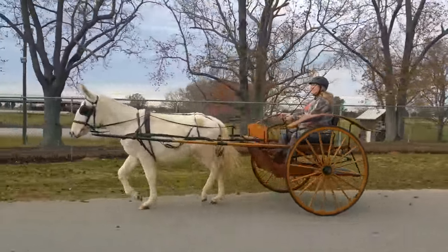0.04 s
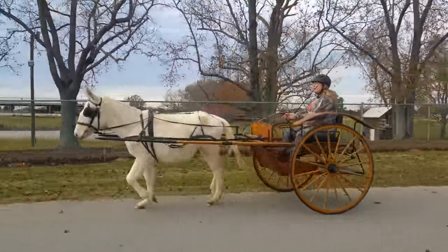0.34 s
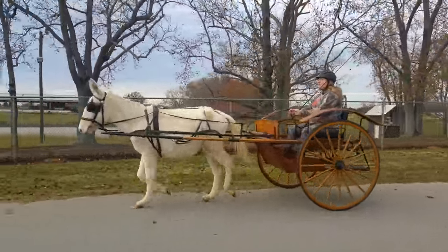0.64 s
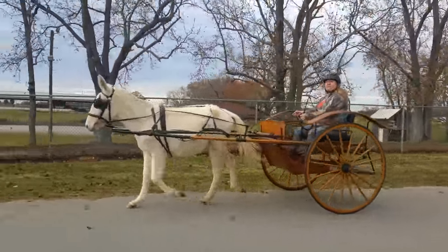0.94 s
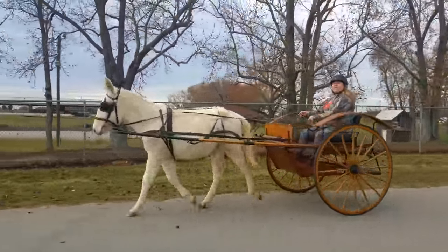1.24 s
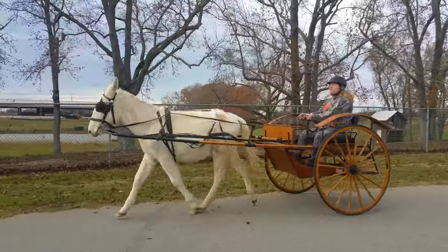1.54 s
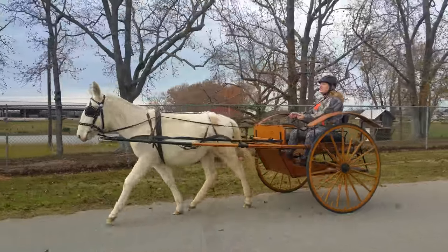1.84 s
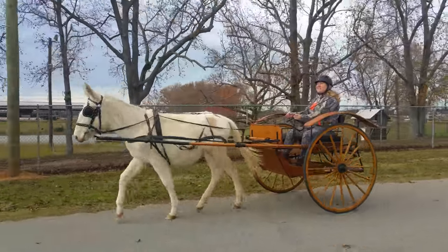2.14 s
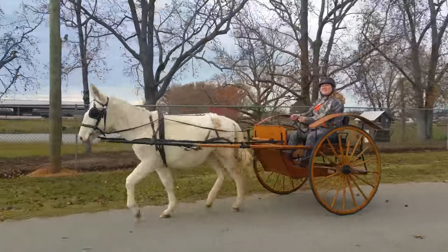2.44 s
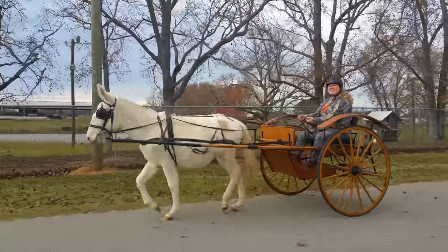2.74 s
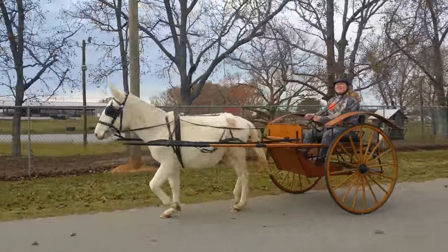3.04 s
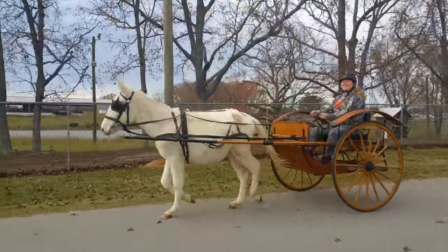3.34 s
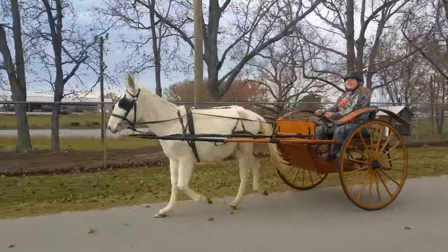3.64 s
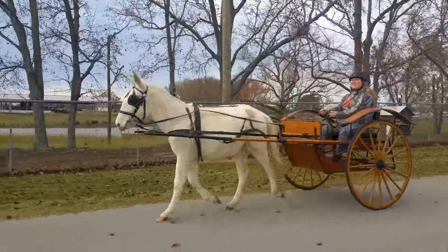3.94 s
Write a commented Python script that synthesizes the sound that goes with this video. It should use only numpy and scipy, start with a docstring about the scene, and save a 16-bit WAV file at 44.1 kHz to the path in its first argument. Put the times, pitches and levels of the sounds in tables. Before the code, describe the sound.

Gritty, slightly hollow hoof clops keep a walking pace on an outdoor road, mixed with bright little rattles from a cart and harness. Dull gusts buffet the accompanying microphone at first, ease off, then return.

```python
"""A mule clops and scuffs along a paved country lane, drawing a light two-wheeled cart.
Each hoof gives a gritty clap and a hollow ring; harness and cart rattle brightly and squeak once,
and grit snaps under shoe and wheel, over a faint outdoor wash. The microphone travels alongside,
and gusts buffet its two ports separately, in short dull thumps and flutters."""
import sys
import numpy as np
from scipy import signal
from scipy.fft import rfft, irfft
from scipy.io import wavfile
from scipy.ndimage import uniform_filter1d

SR = 44100
rng = np.random.default_rng(int(sys.argv[2]) if len(sys.argv) > 2 else 0)


def put_to_file(sound):
    """Save the sound as 16-bit audio at rate SR, in the file named by the first command-line argument."""
    columns = np.atleast_2d(sound).T  # one column per channel
    safe = np.clip(columns, -1, 1)
    whole_steps = np.round(safe * 32767)
    wavfile.write(sys.argv[1], SR, whole_steps.astype(np.int16))


N = 176400
TIME = np.arange(N) / SR

# two noise registers, bright clatter and airy sizzle: (frequency [Hz], level [dB])
CLATTER_EQ = [(1000, -14), (2500, 5.5), (4000, 5.5), (6000, 2), (7500, -7), (10000, -14)]
SIZZLE_EQ = [(4000, -21), (7500, -5), (9500, 2), (12300, 4), (16000, 1)]


def from_db(db):
    """Decibels to gain."""
    return 10 ** (np.asarray(db) / 20)


def rms_one(x):
    """Scale to an rms of 1."""
    return x / np.sqrt(np.mean(x ** 2) + 1e-20)


def at_hz(curve, hz):
    """Read a curve on a log-frequency axis."""
    points_hz, values = np.array(curve).T
    return np.interp(np.log(np.maximum(hz, 1)), np.log(points_hz), values)


def drift(rate_hz):
    """Smooth random modulation; rms 1."""
    pole = np.exp(-2 * np.pi * rate_hz / SR)
    return rms_one(signal.lfilter([1], [1, -2 * pole, pole * pole], rng.standard_normal(N + SR)))[SR:]


def oscillator(hz):
    """A sine that follows a moving frequency; rms 1."""
    return np.sqrt(2) * np.sin(2 * np.pi * np.cumsum(hz) / SR)


def stereo_noise(eq):
    """Coloured noise at both ports, narrow in the bass and wide in the treble; rms 1."""
    # how alike the two ports hear the scene: (frequency [Hz], correlation)
    likeness = [(100, 1), (700, 0.52), (2500, 0.12), (6000, 0.017), (15000, 0.05)]
    # the microphone's lean to one side: (frequency [Hz], left minus right [dB])
    lean = [(200, -4), (1000, 4.5), (2500, -5.5), (5000, -5), (9500, 2)]
    hz = np.arange(N // 2 + 1) * SR / N
    mid, side = rfft(rng.standard_normal((2, N)))
    alike = at_hz(likeness, hz)
    spectrum = np.sqrt(1 + alike) * mid + np.sqrt(1 - alike) * side * [[1], [-1]]
    pan = from_db(at_hz(lean, hz) * [[.5], [-.5]])
    return rms_one(irfft(spectrum * from_db(at_hz(eq, hz)) * pan, N))


def bursts(events, attack_s, release_s, tail_db=None, tail_s=None, swell_db=0):
    """Envelope of (start [s], length [s], level [dB]) events: attack, hold or swell, release, tail."""
    power = np.zeros(N)
    for start, length, db in events:
        span = slice(max(int(start * SR), 0), max(int((start + length + .5) * SR), 0))
        age = np.maximum(TIME[span] - start, 0)
        after = np.maximum(age - length, 0)
        decay = np.exp(-2 * after / release_s)
        if tail_s:
            decay += from_db(tail_db) ** 2 * np.exp(-2 * after / tail_s)
        arch = np.sin(np.pi * np.minimum(age / length, 1)) - 2 / np.pi
        power[span] += (from_db(db + swell_db * arch) * np.minimum(age / attack_s, 1)) ** 2 * decay
    return np.sqrt(power)


def outdoors():
    """The bed: distant traffic and trees, and a faint, steady high hiss of the microphone."""
    # outdoor wash: (frequency [Hz], level [dB])
    wash_eq = [(25, -1.5), (70, 7), (200, -6.5), (500, -9), (1000, -14), (1500, -21.5), (3000, -20.5),
               (5500, -23), (7500, -38.5), (16000, -42)]
    wash = from_db(-43 + 1.53 * drift(10)) * stereo_noise(wash_eq)
    mic_hiss = from_db(-70.5) * stereo_noise(SIZZLE_EQ)
    return wash + mic_hiss


def turbulence(gusts, eq):
    """Wind noise at one port: it flutters within each gust and brightens as it grows stronger."""
    reference_db, pivot_hz, brightening = -17, 228, 0.47
    flutter = from_db(3.5 * drift(70.5))
    flutter /= np.sqrt(uniform_filter1d(flutter ** 2, size=SR // 36))
    breeze = from_db(-64 + 13.5 * drift(13.5))  # light air between the gusts
    strength = np.hypot(bursts(gusts, attack_s=0.00075, release_s=0.012) * flutter, breeze)
    tilt_db_per_octave = brightening * (20 * np.log10(strength) - reference_db)
    edges_hz = 18 * 2 ** np.arange(0, 9.6, .5)
    white = rng.standard_normal((2, N))  # neighbouring bands get unrelated noise
    steady, tilted = 0, 0
    for k, (low, high) in enumerate(zip(edges_hz, edges_hz[1:])):
        hz = np.sqrt(low * high)
        bandpass = signal.butter(3, [low, high], "band", fs=SR, output="sos")
        band = from_db(at_hz(eq, hz)) * signal.sosfilt(bandpass, white[k % 2])
        steady += band
        tilted += band * from_db(tilt_db_per_octave * np.clip(np.log2(hz / pivot_hz), -1, 2.5))
    return strength * tilted / np.sqrt(uniform_filter1d(steady ** 2, size=700) + 1e-12)


def thumps(eddies):
    """An eddy pushes on the port and shakes the pressure through a few large, uneven swings."""
    swing_db, push_db, wander_octaves = -1, -7, 0.6
    wander = 2 ** (wander_octaves * np.clip(drift(259.3), -2, 1))
    pressure = 0
    for start, length, db, hz in eddies:
        envelope = bursts([(start, length, db)], attack_s=0.0012, release_s=0.0036)
        pressure += envelope * (from_db(swing_db) * oscillator(hz * wander) + from_db(push_db))
    return signal.sosfilt(signal.butter(2, 60, "high", fs=SR, output="sos"), pressure)


def wind():
    """Each port takes its own gusts; single eddies add a thump and a puff of noise on the left."""
    # gusts hitting each port: (start [s], length [s], level [dB])
    gusts_left = [(0.023, 0.016, -18), (0.238, 0.026, -20), (0.267, 0.036, -17), (0.37, 0.0055, -14),
                  (0.408, 0.027, -12), (0.454, 0.016, -13.5), (0.483, 0.0091, -12), (0.512, 0.058, -16),
                  (0.942, 0.027, -32.5), (1.803, 0.012, -20.5), (1.99, 0.045, -29.5),
                  (2.153, 0.0075, -22.5), (2.707, 0.018, -29), (2.789, 0.084, -20.5), (2.801, 0.037, -8.5),
                  (2.913, 0.012, -11.5), (2.976, 0.0088, -21.5), (3.045, 0.062, -19.5),
                  (3.105, 0.0083, -13), (3.271, 0.0027, -15.5), (3.323, 0.0043, -15), (3.336, 0.007, -15),
                  (3.484, 0.0052, -16), (3.556, 0.0062, -22), (3.92, 0.068, -18.5), (3.935, 0.0087, -10)]
    gusts_right = [(0.02, 0.038, -23.5), (0.06, 0.035, -21.5), (0.096, 0.0059, -13.5),
                   (0.123, 0.037, -17.5), (0.3, 0.035, -22), (0.343, 0.0033, -14), (0.41, 0.039, -21.5),
                   (0.447, 0.02, -16.5), (0.65, 0.025, -26.5), (0.905, 0.05, -28.5), (1.02, 0.094, -28.5),
                   (1.404, 0.0015, -21.5), (1.73, 0.036, -22), (1.838, 0.059, -21.5), (2.016, 0.068, -28),
                   (2.195, 0.025, -21.5), (2.375, 0.017, -26.5), (2.728, 0.089, -26), (2.74, 0.0088, -16),
                   (2.826, 0.121, -17), (2.831, 0.023, -12.5), (2.968, 0.057, -22.5), (3.085, 0.09, -24),
                   (3.372, 0.0046, -14.5), (3.392, 0.062, -22), (3.51, 0.1, -28), (3.599, 0.013, -16.5),
                   (3.666, 0.025, -17), (3.745, 0.086, -29.5), (3.815, 0.013, -24.5),
                   (3.964, 0.0027, -12.5), (3.982, 0.03, -19)]
    # tone of the wind at each port before the tilt: (frequency [Hz], level [dB])
    eq_left = [(22, -4), (45, -4.5), (80, 2.5), (150, 2), (400, -6), (750, -14.5), (1300, -32), (2200, -61),
               (5000, -100), (12000, -92)]
    eq_right = [(22, -35), (45, -29), (80, -7), (150, -2.5), (400, 1), (750, -4.5), (1300, -24),
                (2200, -34), (5000, -61), (12000, -89)]
    # eddies: (start [s], length [s], relative level [dB], centre pitch [Hz])
    eddies = [(0.184, 0.0031, -11, 360), (.358, 0.0065, -5.5, 283), (0.489, 0.0035, -7, 600),
              (0.549, 0.0052, -15, 280), (1.207, 0.011, -11, 290), (1.343, 0.0042, -10, 390),
              (2.152, 0.019, -16.5, 208), (3.545, 0.0021, -5, 379.6), (3.624, 0.0079, -7, 532),
              (3.903, 0.0025, -9, 189.8)]
    puffs = [(start, length, db - 2.5) for start, length, db, _ in eddies]
    left = turbulence(list(gusts_left) + puffs, eq_left) + thumps(eddies)
    return np.array([left, turbulence(gusts_right, eq_right)])


def squeak():
    """One faint, thin squeak that wavers as it glides down."""
    # the glide: (start [s], length [s], first pitch [Hz], last pitch [Hz], level [dB])
    glide = [(3.424, 0.04, 5050, 4800, -49.5)]
    start, length, first_hz, last_hz, db = glide[0]
    waver = 1 + 0.0231 * drift(246)
    pitch = waver * np.interp(TIME, [start, start + length], [first_hz, last_hz])
    return bursts([(start, length, db)], attack_s=0.0062, release_s=0.0062) * oscillator(pitch)


def grit_snaps():
    """Grains of grit crack under shoe and wheel, each a sharp, bright tick."""
    # cracking grains: (time [s], relative level [dB])
    snaps = [(0.386, -47), (1.3, -43.5), (1.432, -49), (2.191, -37.5), (2.592, -48.5), (2.843, -34),
             (3.052, -42.5)]
    crack_s = 0.00024
    envelope = bursts([(start, crack_s, db) for start, db in snaps], crack_s, release_s=0.004)
    return envelope * (stereo_noise(SIZZLE_EQ) + from_db(4.5) * stereo_noise(CLATTER_EQ))


def rattles():
    """Harness, cart and shoes rattle and scuff; clatter and sizzle each crackle with their own grain."""
    # rattles and scuffs: (start [s], length [s], relative level [dB], clatter send [dB])
    shakes = [(0.001, 0.013, -45, -4.5), (0.418, 0.03, -61, 20.5), (0.433, 0.038, -46, 10),
              (0.482, 0.0041, -60, 20), (0.633, 0.037, -65.5, 11.5), (0.683, 0.036, -55, -3),
              (1.058, 0.08, -56.5, 6), (1.179, 0.023, -48, 9.5), (1.368, 0.03, -56.5, 8.5),
              (1.434, 0.042, -56, 6), (1.594, 0.055, -45.5, 0), (1.702, 0.043, -59, 6.5),
              (2.023, 0.049, -57, 5), (2.386, 0.012, -58, 9.5), (2.711, 0.02, -52.5, 5.5),
              (3.12, 0.001, -52.5, 19), (3.381, 0.03, -56.5, 7.5), (3.423, 0.06, -59.5, 9),
              (3.715, 0.017, -57.5, 5.5)]
    sizzle_db, clatter_db, grain_db = -2.5, 1.5, 4
    shape = dict(attack_s=0.00081, release_s=0.0036, tail_db=-6, tail_s=0.029, swell_db=7.5)
    sizzles = [(start, length, db + sizzle_db) for start, length, db, _ in shakes]
    clatters = [(start, length, db + send + clatter_db) for start, length, db, send in shakes]
    sizzle = bursts(sizzles, **shape) * stereo_noise(SIZZLE_EQ)
    clatter = bursts(clatters, **shape) * stereo_noise(CLATTER_EQ)
    return sum(layer * rms_one(from_db(grain_db * drift(460))) for layer in (sizzle, clatter))


def road_ticks():
    """Random small knocks of grit under the wheels, as events for bursts()."""
    ticks_per_s, length_s = 22, 0.002
    gap_draws, level_draws = rng.random((400, 2)).T
    starts = np.cumsum(-np.log(gap_draws)) / ticks_per_s
    levels = -39.5 - 2 * level_draws
    return [(start, length_s, db) for start, db in zip(starts, levels) if start < N / SR]


def hoof_ring(age):
    """The hoof itself rings, its modes a little different in pitch and force on every hit."""
    # hoof modes: (frequency [Hz], relative level [dB], decay by 60 dB [s])
    modes = [(1019, -3, 0.16), (1913, -1.5, 0.049), (2530, -3.5, 0.02)]
    ring_db, pitch_spread = -6, 0.029
    ring = 0
    for hz, db, t60 in modes:
        detune, force = rng.standard_normal(2)
        tone = np.sign(force) * np.sin(2 * np.pi * hz * (1 + pitch_spread * detune) * age)
        ring += from_db(db + ring_db + 2 * force) * tone * np.exp(-np.log(1000) * age / t60)
    return ring


def hooves():
    """Each clop is a gritty clap, the hollow note of the cavity under the hoof, and the hoof's ring."""
    # landings and toe scuffs: (start [s], length [s], relative level [dB], cavity pitch [Hz])
    contacts = [(0.008, 0.0033, -33, 1540), (0.096, 0.0016, -30, 2210), (0.215, 0.0012, -29.5, 2340),
                (0.546, 0.0071, -34, 1800), (0.69, 0.0048, -28.5, 1545), (0.796, 0.014, -34.5, 2640),
                (0.847, 0.0028, -37, 1046), (0.944, 0.007, -40.5, 2930), (1.098, 0.0023, -31, 2690),
                (1.214, 0.014, -34, 1950), (1.371, 0.012, -42.5, 2010), (1.459, 0.0042, -33, 2960),
                (1.596, 0.0018, -29.5, 1026), (1.859, 0.007, -43.5, 1940), (1.905, 0.012, -38.5, 1014),
                (2.028, 0.0018, -29, 1277), (2.123, 0.0077, -34, 1917), (2.188, 0.0058, -33, 2840),
                (2.242, 0.0038, -30.5, 1297), (2.331, 0.003, -42.5, 2790), (2.455, 0.022, -35.5, 2825),
                (2.561, 0.0034, -34, 1270), (2.71, 0.015, -35, 1120), (2.964, 0.0074, -37, 2460),
                (3.049, 0.0031, -33.5, 1640), (3.138, 0.0027, -30, 2590), (3.242, 0.0023, -29.5, 1242),
                (3.387, 0.015, -36, 2560), (3.489, 0.0073, -36, 2350), (3.561, 0.0083, -36, 1366),
                (3.762, 0.002, -41.5, 2710), (3.784, 0.009, -34, 2636), (3.876, 0.0031, -31, 1264)]
    # clap of hoof on asphalt, shared by the road ticks: (frequency [Hz], level [dB])
    clap_eq = [(200, -39), (700, 4.5), (1050, 6.5), (1500, 6), (2000, 5), (2800, 4), (3700, -4.5),
               (5500, -8.5), (7200, -32), (15000, -33)]
    attack_s, clap_db, cavity_db, cavity_release_s = 0.003, -1, -5.5, 0.01
    hits = [(start, length, db) for start, length, db, _ in contacts] + road_ticks()
    envelope = bursts(hits, attack_s, release_s=0.0097, tail_db=-9, tail_s=0.023)
    grain = rms_one(from_db(-0.5 * drift(300)))
    claps = from_db(clap_db) * envelope * grain * stereo_noise(clap_eq)
    body, age = np.zeros(N + SR), TIME[:SR // 5]
    waver = 1 + 0.042 * drift(300)
    for start, length, db, hz in contacts:
        onset = int(start * SR)
        gate = np.minimum(age / attack_s, 1) * np.exp(-np.maximum(age - length, 0) / cavity_release_s)
        cavity = oscillator(hz * np.roll(waver, -onset)[:len(age)])
        body[onset:onset + len(age)] += from_db(db + cavity_db) * gate * cavity
        peak = onset + int(attack_s * SR)
        body[peak:peak + len(age)] += from_db(db) * hoof_ring(age)
    return claps + body[:N]


def scene():
    """Wind on the microphone, over mule, cart and surroundings."""
    return wind() + hooves() + rattles() + grit_snaps() + squeak() + outdoors()


def record(dry):
    """Soft clipping rounds the strongest thumps; a steep low-pass cuts the very top."""
    cutoff_hz = 16000
    rounded = dry / (1 + dry ** 4) ** .25
    return signal.sosfilt(signal.ellip(10, .2, 80, cutoff_hz, fs=SR, output="sos"), rounded)


dry = scene()
out = record(dry)
put_to_file(out)
```